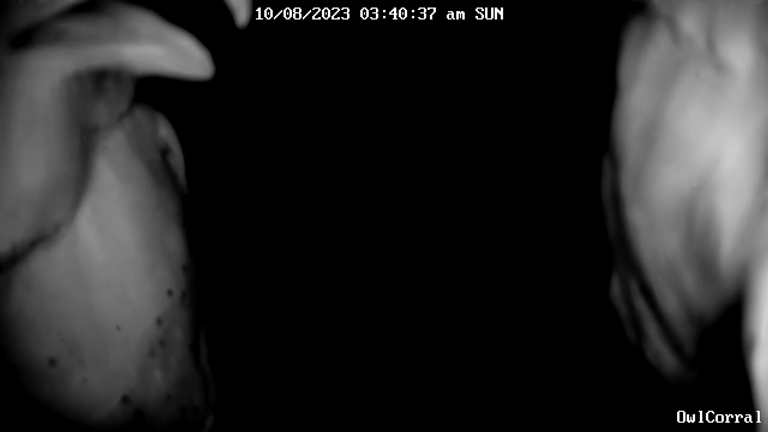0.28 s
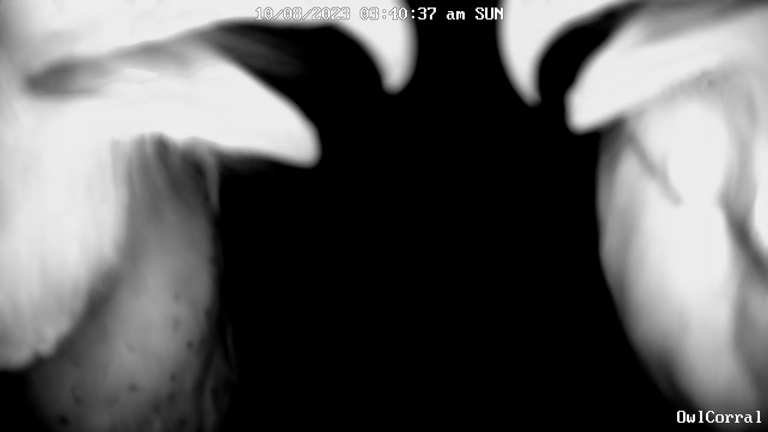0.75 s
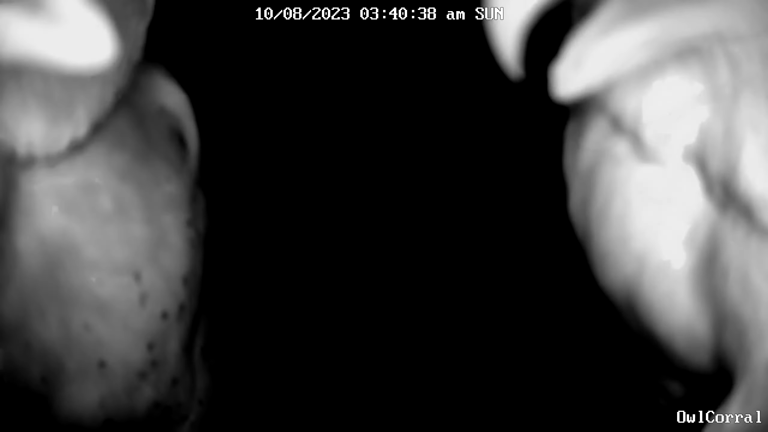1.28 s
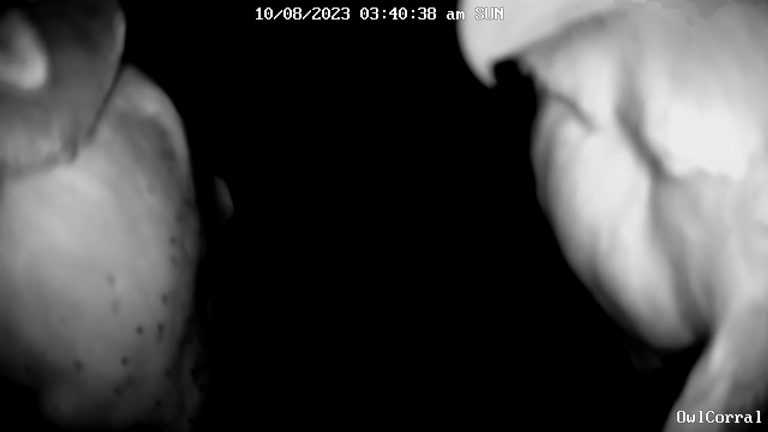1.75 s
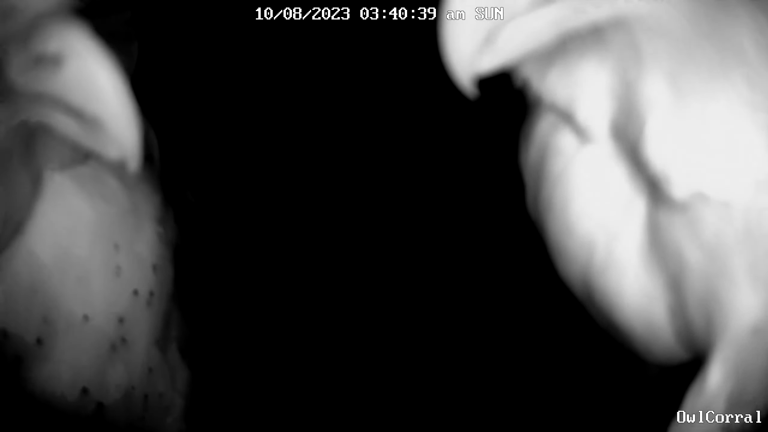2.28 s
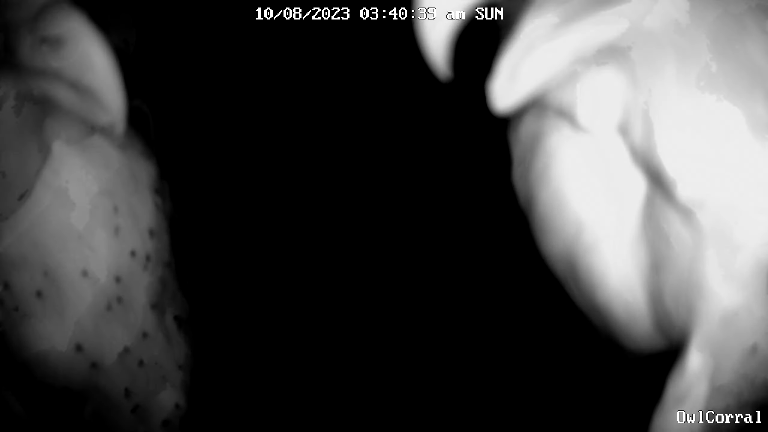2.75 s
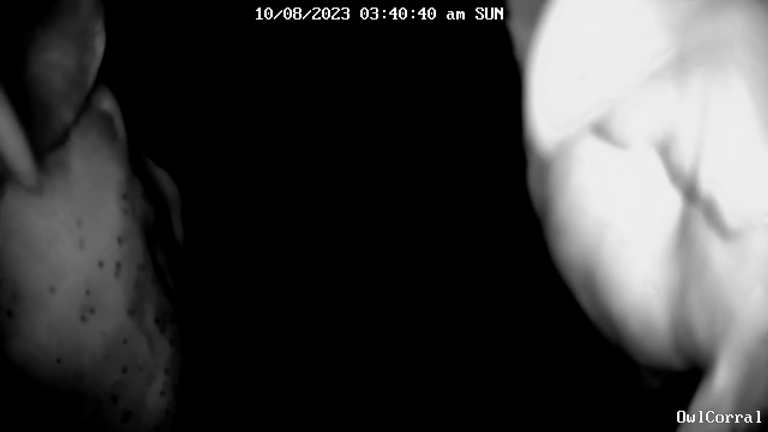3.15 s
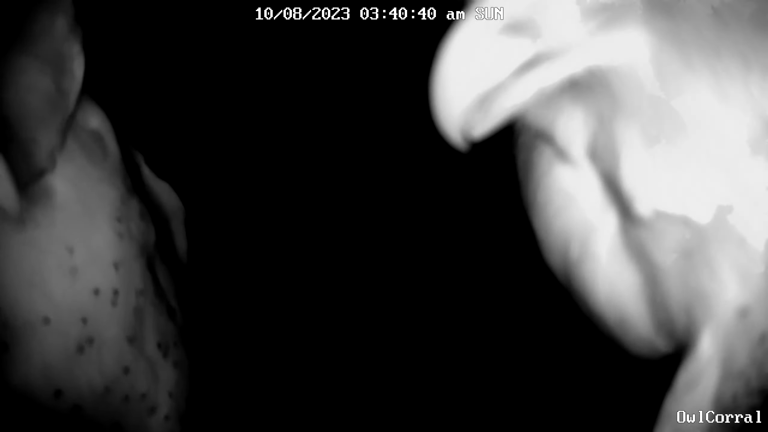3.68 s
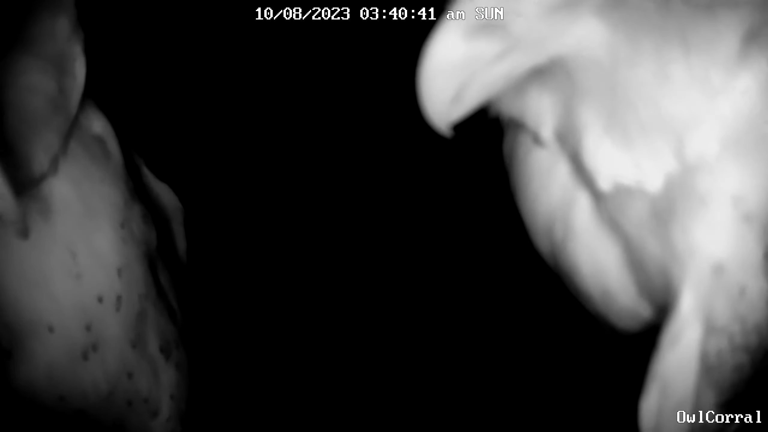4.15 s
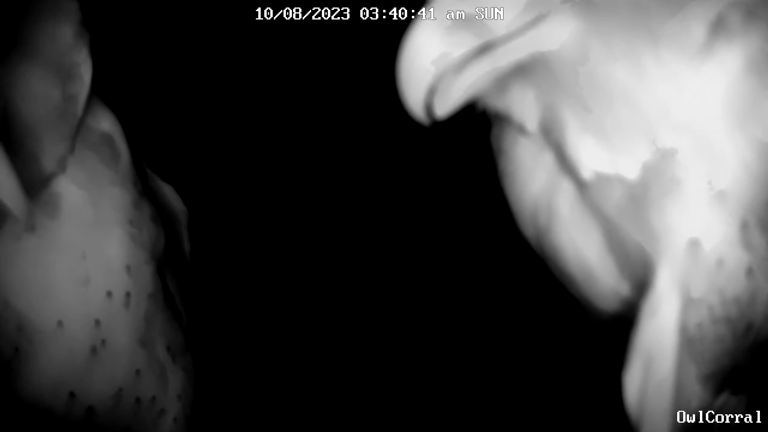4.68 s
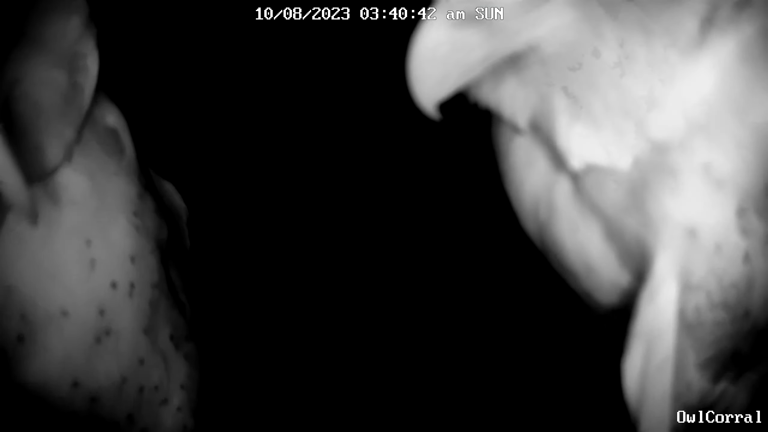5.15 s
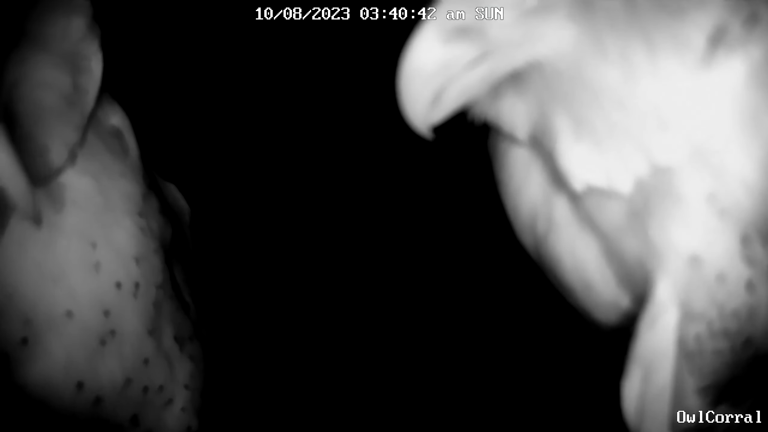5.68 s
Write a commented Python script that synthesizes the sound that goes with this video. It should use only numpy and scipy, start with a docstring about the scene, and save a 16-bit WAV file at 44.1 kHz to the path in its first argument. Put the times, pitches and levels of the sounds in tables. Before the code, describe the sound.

Inside a small wooden nest box, two owls nibble right beside a microphone. Sharp beak clicks, tiny squeaks and wet smacks come quickly over feather scrapes, soft thuds and low rumble. Three hard knocks strike the housing around two seconds, its mount humming low. Then the birds settle, leaving sparse, softer, squeakier beak closings and faint feather brushes over low background noise.

```python
"""Two owls nibble in a wooden nest box: their beaks part with wet smacks and close with squeaks and clicks.
Each squeak is a gliding tone, each smack a pulse rising in pitch, each click a damped ring with a noise crack.
Feathers scrape the housing of a small camera right beside them, as sparse damped grains and shaped noise.
The housing knocks and thuds in damped modes and low glides, rumbles as noise, and hums on its mount.
The box adds short noise tails; a steep low-pass dulls the contacts above about 5 kHz; low noise lies below."""
import sys
import numpy as np
from scipy import signal
from scipy.fft import rfft, irfft
from scipy.io import wavfile
from scipy.ndimage import uniform_filter1d

SR = 44100
rng = np.random.default_rng(int(sys.argv[2]) if len(sys.argv) > 2 else 0)


def master(y):
    """Save y as 16-bit WAV."""
    cut = np.clip(np.atleast_2d(y).T, -1, 1)
    pcm = np.round(cut * 32767)  # scale
    wavfile.write(sys.argv[1], SR, pcm.astype(np.int16))


N = 261513
TIME = np.arange(N) / SR

# Spectral weighting of the background: (frequency [Hz], relative level [dB])
FLOOR_SPECTRUM = [(15, 4), (45, -0.5), (75, 3.5), (100, -0.5), (122, 7.5), (180, -16), (300, -12.5),
                  (600, -23.5), (950, -19), (1700, -29), (4000, -30.5), (7400, -35), (9000, -49),
                  (16000, -52)]
# Spectral weighting of the bright hiss: (frequency [Hz], relative level [dB])
HISS_SPECTRUM = [(500, -7), (1000, -18.5), (1650, 0.5), (2600, -10), (3800, -6), (5500, -2), (7000, -1),
                 (8200, -12.5), (9400, -48.5)]
# Bursts of bright hiss: (start [s], length [s], starting level [dB], fall over the length [dB])
HISS_BURSTS = [(0.53, 0.085, -33, 29), (0.599, .15, -72, -1), (1.3045, .006, -24, 10),
               (1.306, 0.14, -39, 6.5), (1.748, 0.13, -43, 27), (1.794, 0.0051, -29.5, 6.5),
               (2.181, .006, -43, 18), (3.855, 0.089, -44.5, 26), (4.044, 0.08, -55, 9.5)]
# Spectral weighting of brushed plumage: (frequency [Hz], relative level [dB])
PLUMAGE_SPECTRUM = [(450, -14), (850, 8.5), (5000, -4), (7500, 4.5), (9000, -25)]
# Faint feather brushes: (start [s], length [s], rms level at the top of the swell [dB], pitch [Hz], Q [1])
BRUSHES = [(3.178, 0.24, -65, 1674, 0.59), (3.419, 0.19, -68.5, 1052, 1.2), (4.461, 0.048, -61, 831, 5),
           (5.169, 0.29, -68, 1000, 1.4), (5.605, 0.044, -61, 900, 3.4)]
# Pushes that set the mount swinging: (start [s], length [s], rms hum level at the top of the push [dB])
PUSHES = [(.95, 0.23, -30.5), (1.623, 0.2, -21), (1.804, .21, -23.5)]
# Spectral weighting of the housing's rumble: (frequency [Hz], relative level [dB])
RUMBLE_SPECTRUM = [(20, -4), (45, -6.5), (80, -6), (125, 2), (200, -12.5), (310, -8.5), (500, -18.5),
                   (900, -39)]
# Weight shifting against the housing: (time [s], rumble level before a common trim [dB])
WEIGHT_SHIFTS = [(0, -36.5), (.12, -41.5), (.2, -39), (.56, -34), (.64, -57), (.73, -43), (.92, -52.5),
                 (1.02, -33), (1.16, -54.5), (1.24, -42.5), (1.59, -52.5), (1.68, -40.5), (1.85, -32),
                 (2.05, -59), (2.9, -83.5)]
# Spectral weighting of scraped feathers: (frequency [Hz], relative level [dB])
SCRAPE_SPECTRUM = [(300, -13), (620, -9.5), (900, 5.5), (1200, 0.5), (1450, -7.5), (2400, -6.5), (3100, -9),
                   (4100, -11), (4450, 2.5), (4900, -8)]
# Rustle under the strokes, dying away as the birds settle: (time [s], level before a common trim [dB])
RUSTLE = [(0, -59.5), (.5, -62), (.64, -69), (1.1, -63.5), (1.18, -73), (1.26, -68), (1.85, -58.5),
          (2.05, -73.5), (2.4, -73), (2.9, -86.5)]
# Feather strokes along the housing: (start [s], length [s], top level before a common trim [dB])
STROKES = [(0, 0.1, -56.5), (.118, 0.092, -42.5), (.305, 0.059, -46.5), (.36, 0.061, -47.5),
           (.425, 0.18, -51), (.77, 0.055, -53.5), (.862, 0.052, -49.5), (1.08, 0.043, -45),
           (1.225, 0.043, -46), (1.44, 0.075, -55.5), (1.51, 0.065, -53), (1.625, 0.095, -47),
           (1.73, 0.075, -53), (1.895, 0.039, -52.5), (1.99, 0.039, -54.5), (2.12, 0.11, -52.5)]
# Soft thuds of a body on the housing: (start [s], length [s], starting pitch [Hz], peak level [dB])
THUDS = [(0.034, 0.024, 100, -27), (0.239, 0.047, 112, -21), (0.534, 0.052, 158.3, -18),
         (0.967, 0.051, 141.8, -14), (1.217, 0.029, 133.7, -31)]
# Hard knocks on the housing: (time [s], level [dB])
KNOCKS = [(1.6255, -12), (1.7965, -15.5), (2.1265, -16.5)]
# Modes of the housing: (mean frequency [Hz], level relative to the knock [dB], decay by 60 dB [s])
HOUSING_MODES = [(89, -17.5, 0.36), (163.65, -13, 0.24), (232.7, -12.5, 0.087), (271.4, 2.5, 0.11),
                 (302.1, -7.5, .05), (390, -15.5, 0.079), (715, -15.5, 0.033), (1135, -2.5, 0.033),
                 (1482, -10, 0.03), (1756, -20, 0.0041)]
# Spectral weighting of the box's reflections: (frequency [Hz], relative level [dB])
BOX_SPECTRUM = [(200, -8), (700, -1), (1400, -10.5), (2300, -7), (3500, -12.5), (4600, 1), (8000, 2.5)]
# Clicks, some alone, some together with a squeak or knock: (time [s], level [dB], pitch [Hz])
CLICKS = [(.045, -24, 880), (0.057, -18.5, 972), (.185, -22.5, 2240), (0.307, -35, 1200), (0.39, -28, 970),
          (0.458, -16.5, 3570), (0.506, -32, 2800), (0.7131, -17.5, 750), (.970, -33, 3470),
          (1.069, -34.5, 2800), (1.6237, -3, 4287), (1.677, -9.5, 2180), (1.7947, -9.5, 4530),
          (1.994, -13, 2000), (2.125, -3.5, 4197), (2.2007, -25, 1793), (2.6094, -15, 2500),
          (3.549, -44.5, 1800), (3.824, -29, 883), (3.857, -22.5, 1450), (4.156, -13.5, 2390),
          (4.48, -49, 1293), (4.871, -27.5, 1990), (5.61, -48, 1200)]
# Wet smacks as a beak opens: (start [s], starting pitch [Hz], level of the fundamental [dB])
SMACKS = [(1.217, 790, -18.5), (1.436, 790, -18), (1.6515, 840, -13.5), (1.897, 824, -19.5),
          (2.181, 1039, -20.5), (2.395, 764.5, -23), (2.587, 812, -23.5), (4.032, 718, -38.5),
          (4.8445, 819, -28)]
# Beak closings, a slide ending in a snap: (snap time [s], slide length [s], start pitch [Hz],
# end pitch [Hz], snap level [dB], slide level relative to the snap [dB], rasp or dryness [0-1])
CLOSINGS = [ (.149, 0.0063, 4596, 3900, -28, -3.5, 0.92), (0.463, 0.0076, 4230, 4450, -16, -8.5, 0.16),
            (.528, 0.0043, 3310, 4300, -14.5, -10, 0.77), (0.535, 0.0042, 4555, 4700, -3.5, -8.5, 0.01),
            (0.742, 0.006, 4220, 2300, -31.5, -4, 0.24), (.801, .008, 3700, 2010, -20, -18, 0.1),
            (.8665, 0.0065, 3600, 3060, -17, -21, 0.24), (1.0337, .0045, 4070, 2510, -17.5, -7, 0.02),
            (1.0953, 0.0026, 3433, 3950, -9, -14, 0.08), (1.247, 0.0057, 3500, 3000, -7, -8, 0),
            (1.306, 0.0018, 3610, 4000, -7, -10, 0.24), (1.411, 0.0065, 4830, 3700, -22.5, -7.5, 0.28),
            (1.422, 0.0076, 3650, 3000, -27.5, -6.5, .15), (1.466, .008, 3700, 2900, -13, -14, 0.01),
            (1.5232, .003, 3370, 3874, -4.5, -12, 0.4), (1.7402, 0.0027, 3400, 3860, -1.5, -10, 0.15),
            (1.921, 0.017, 3140, 2750, -15, -6, 0.26), (1.995, 0.0015, 3056, 3100, -19.5, -10, 0),
            (2.424, 0.012, 2542, 1300, -16, -6, 0.96), (2.618, .018, 2634, 1526, -15, -11.5, 0.49),
            (3.795, 0.014, 2623, 2380, -23, -7.5, 0.15), (3.857, .022, 4210, 2600, -17, -12.5, 0.34),
            (4.065, 0.024, 3206, 2650, -26.5, -11.5, 0.58), (4.156, 0.02, 3600, 2600, -25.5, -13.5, 0.94),
            (4.675, .019, 2773, 2650, -25, -11, 0.17), (4.87, 0.016, 2834, 2860, -29, -6, 0.41),
            (4.88, 0.0078, 2586, 1930, -31, -2.5, 0.25)]
# Resonances of the open beak: (frequency [Hz], Q [1], level relative to the source [dB])
BEAK_MODES = [(1440, 17, -6.5), (3078.6, 66, -12)]

FLOOR_DB = -64.5  # before the heave
MOUNT_HZ = 74.2  # mean pitch of the hum
PUSH_PEAK, STROKE_PEAK = 0.29, 0.67  # share of the length at which each is strongest
RING_ON_DB, RING_ON_FADE_S = -17, 0.14  # the mount rings on after a push
SHAKE_DB, SHAKE_FADE_S = -18.5, 0.024  # knocks and thuds leave the housing rumbling
JOLT_DB, JOLT_FADE_S = -18, 0.028  # each beak contact jolts the body
JOLT_LIMIT, JOLT_TOP_HZ = 0.15, 140  # amplitude at which a jolt saturates; low-pass of its rumble
TRAIL_DB, TRAIL_FADE_S = -28, 0.0031  # a short grainy noise tail follows each beak contact
THUD_SAG = 0.72  # end pitch over start pitch
CRACK_TOP = 2.6  # cutoff of a crack over its pitch
TIP_DB, TIP_HZ, TIP_LEAD_S = -0.5, 1760, 0.0014  # tip click of a fully dry closing; lead before its snap
SMACK_S, SMACK_RISE = 0.0064, 1.724  # length; end pitch over start pitch
SNAP_S, SLIDE_ATTACK_S = 0.0031, 0.0046  # half the length of a snap; rise of a slide
GLIDE_BEND = 1.8  # over 1: the pitch moves faster and faster as the beak shuts
DULL_HZ, TOP_HZ = 4536, 16400  # low-pass of the contacts; top of the recorder
CEILING = 0.82  # amplitude that rounded peaks approach


def undb(db):
    """Level to amplitude: 20 dB is a factor of ten."""
    return 10 ** (np.asarray(db) / 20)


def unit(x):
    """Normalisation: divide by the root mean square."""
    return x / np.sqrt(np.mean(x ** 2) + 1e-18)


def curve(rows):
    """Envelope: gain interpolated in decibels from (time [s], level [dB])."""
    return undb(np.interp(TIME, *np.transpose(rows), right=-120))


def add(track, s, sound):
    """Superposition: sum a sound into the track at a time in seconds."""
    start = int(s * SR)
    track[start:start + len(sound)] += sound[:N - start]


def colour(x, points):
    """Spectral weighting: scale each frequency by a smooth curve, then normalise to rms 1."""
    hz, db = np.transpose(points)
    f = np.arange(len(x) // 2 + 1) * SR / len(x)
    gain = undb(np.interp(np.log(f + 1), np.log(hz), db, right=-120))
    return unit(irfft(rfft(x) * gain, len(x)))


def lowpass(x, hz, order):
    """Low-pass filtering: a causal Butterworth attenuates above its cutoff."""
    return signal.sosfilt(signal.butter(order, min(hz, SR / 2 - 1), fs=SR, output="sos"), x)


def highpass(x, hz, order):
    """High-pass filtering: a causal Butterworth attenuates below its cutoff."""
    return signal.sosfilt(signal.butter(order, hz, "high", fs=SR, output="sos"), x)


def band(x, hz, q):
    """Resonance: one peak whose Q sets its width."""
    return signal.lfilter(*signal.iirpeak(hz, max(q, hz / 10000), fs=SR), x)


def wander(size, rate):
    """Random modulation: normal values, rate a second, joined by straight lines."""
    place = np.arange(size) / SR * rate
    knots = rng.standard_normal(size + 1)
    return np.interp(place, np.arange(size + 1), knots)


def swell(length, peak):
    """Envelope: a rounded rise and fall, its top at the given share of the length."""
    u = np.linspace(0, 1, max(int(length * SR), 2))
    ramp = np.interp(u, [0, np.clip(peak, 0.05, 0.95), 1], [0, 1, 0])
    return np.sin(np.pi / 2 * ramp) ** 0.92


def strokes(rows, peak):
    """Envelope: summed swells from (start [s], length [s], level [dB])."""
    out = np.zeros(N)
    for s, length, db in rows:
        add(out, s, undb(db) * swell(length, peak))
    return out


def lingering(x, fade_s):
    """Energy integration: the square root of exponentially averaged power lets go slowly."""
    keep = np.exp(-1 / (fade_s * SR))
    return np.sqrt(signal.lfilter([1 - keep], [1, -keep], x ** 2) + 1e-18)


def glide(size, start_hz, end_hz, jitter, rate, bend=1):
    """Frequency modulation: phase is the running sum of an unsteady, gliding frequency."""
    hz = start_hz + (end_hz - start_hz) * np.linspace(0, 1, size) ** bend
    return 2 * np.pi * np.cumsum(hz * (1 + jitter * wander(size, rate))) / SR


def still_air():
    """Broadband background: mostly low noise whose level heaves gently at random."""
    heave_db = wander(N, rate=12)
    return colour(rng.standard_normal(N), FLOOR_SPECTRUM) * undb(FLOOR_DB + heave_db)


def hiss_and_brushes():
    """Shaped noise: bursts of bright hiss, mostly falling in level, and soft resonant brushes of plumage."""
    level = np.zeros(N)
    for s, length, db, fall_db in HISS_BURSTS:
        progress = np.linspace(0, 1, int(length * SR))
        release = np.minimum(5 * (1 - progress), 1)  # fades over the last fifth
        add(level, s, undb(db - fall_db * np.sqrt(progress)) * release)
    hiss = colour(rng.standard_normal(N), HISS_SPECTRUM) * undb(1.5 * wander(N, rate=200))
    out = uniform_filter1d(level, size=64) * hiss
    for s, length, db, hz, q in BRUSHES:
        env = swell(length, peak=0.83)
        air = colour(band(rng.standard_normal(len(env)), hz, q), PLUMAGE_SPECTRUM)
        add(out, s, undb(db) * env * air)
    return out


def swinging():
    """Driven oscillation: the mount hums near its resonance while pushed, then rings on faintly."""
    push = strokes(PUSHES, PUSH_PEAK)
    size = np.maximum(push, undb(RING_ON_DB) * lingering(push, RING_ON_FADE_S))
    hum = np.sqrt(2) * np.sin(glide(N, MOUNT_HZ, MOUNT_HZ, jitter=0.03, rate=15))
    return hum * size


def leaning(blows, rumble_db=-1, flutter_db=3):
    """Sliding friction: a body rubs unevenly along the housing, which rumbles more after each blow."""
    shake = undb(SHAKE_DB) * lingering(blows, SHAKE_FADE_S)
    weight = np.hypot(undb(rumble_db) * curve(WEIGHT_SHIFTS), shake)
    rumble = colour(rng.standard_normal(N), RUMBLE_SPECTRUM)
    return rumble * weight * undb(flutter_db * wander(N, rate=43))


def jolting(beak):
    """Structure-borne sound: nibbles pass through the body into the housing as a short deep rumble."""
    push = lingering(JOLT_LIMIT * np.tanh(beak / JOLT_LIMIT), JOLT_FADE_S)
    rumble = colour(rng.standard_normal(N), RUMBLE_SPECTRUM)
    return lowpass(undb(JOLT_DB) * push * rumble, JOLT_TOP_HZ, order=4)


def scraping(beak, rate=1100, spread_db=6.0, cycles=6.1, smooth=0.35, patchy_db=3, scrape_db=-1):
    """Stick-slip: feather barbs catch and slip in uneven patches, each with its own brief pitch."""
    rustle_s = RUSTLE[-1][0]
    barbs, t = np.zeros(N), TIME[:400]
    for when, pitch, size in rng.random((int(rustle_s * rate), 3)):
        hz = 600 + 4000 * pitch
        grain = np.sin(2 * np.pi * hz * t) * np.exp(-t * hz / cycles)
        strength = undb(-spread_db * np.log(size + 0.02)) * np.sqrt(hz)  # few strong, many weak
        add(barbs, when * rustle_s, strength * grain)
    scrape = colour(unit(barbs) + smooth * rng.standard_normal(N), SCRAPE_SPECTRUM)
    rub = undb(scrape_db) * (curve(RUSTLE) + strokes(STROKES, STROKE_PEAK))
    trail = undb(TRAIL_DB) * lingering(beak, TRAIL_FADE_S)
    return scrape * np.hypot(rub, trail) * undb(patchy_db * wander(N, rate=160))


def thuds():
    """Soft impact: a low tone sags in pitch while a little filtered noise scuffs."""
    out = np.zeros(N)
    for s, length, start_hz, db in THUDS:
        env = swell(length, peak=0.42)
        phase = glide(len(env), start_hz, start_hz * THUD_SAG, jitter=0.15, rate=73)
        noise = band(rng.standard_normal(len(env)), hz=2 * start_hz, q=0.72)
        scuff = unit(lowpass(noise, hz=3 * start_hz, order=6))
        add(out, s, undb(db) * env * (np.sin(phase) + 0.14 * scuff))
    return out


def knocks(rise_s=0.00017, body_db=-17, body_s=0.04):
    """Modal excitation: a blow rings damped modes, the low ones building up later, over a dull thump."""
    out, t = np.zeros(N), TIME[:SR // 2]
    for s, db in KNOCKS:
        for hz, mode_db, t60 in HOUSING_MODES:
            rise = 1 - np.exp(-t / rise_s * hz / 300)  # rise_s holds at 300 Hz
            detune = 1 + 0.025 * rng.standard_normal()
            decay = np.exp(-np.log(1000) * t / t60)
            ring = np.sin(2 * np.pi * hz * detune * t) * decay
            add(out, s, undb(db + mode_db) * rise * ring)
        noise = band(rng.standard_normal(len(t)), hz=221, q=0.88)
        thump = unit(lowpass(noise, hz=440, order=4))
        add(out, s, undb(db + body_db) * thump * np.exp(-t / body_s))
    return out


def box(x):
    """Reverberation: close wooden walls add two dense noise tails, both set in about 1 ms after the sound."""
    t = TIME[:SR // 3]
    arrive = np.clip(t / 0.00053 - 1, 0, 1)
    response = 0
    for t60_s, db in ((0.048, -14), (0.021, -26)):
        decay = np.exp(-np.log(1000) * t / t60_s)
        echoes = colour(rng.standard_normal(len(t)), BOX_SPECTRUM) * arrive * decay
        response = response + undb(db) * unit(echoes) / np.sqrt(len(t))  # energy set by the level
    return x + signal.fftconvolve(x, response)[:N]


def clicks(ring_s=0.0006, crack_s=0.0017, crack_db=-10):
    """Impulsive contact: each click, listed or at a closing, is a damped ring and a short noise crack."""
    out, t = np.zeros(N), TIME[:1024]
    tips = []
    for s, *_, db, _, rasp in CLOSINGS:
        dryness_db = 10 * np.log10(abs(rasp) + 1e-9)
        tips.append((s - TIP_LEAD_S, db + TIP_DB + dryness_db, TIP_HZ))
    for s, db, hz in CLICKS + tips:
        ring = np.sin(2 * np.pi * hz * t) * np.exp(-t / ring_s)
        noise = band(rng.standard_normal(len(t)), hz, q=0.8)
        crack = unit(lowpass(noise, CRACK_TOP * hz, order=4)) * np.exp(-t / crack_s)
        add(out, s, undb(db) * (ring + undb(crack_db) * crack))
    return out


def smacks(slope_db=-8):
    """Film rupture: a wet film parts as the beak opens, a few quick harmonic pulses rising in pitch."""
    out = np.zeros(N)
    env = swell(SMACK_S, peak=0.4)
    for s, hz, db in SMACKS:
        phase = glide(len(env), hz, hz * SMACK_RISE, jitter=0.04, rate=490)
        pulses = sum(undb(slope_db * k) * np.cos((k + 1) * phase) for k in range(4))
        add(out, s, undb(db) * env * pulses)
    return out


def squeaks(overtone_db=-9, grit_db=-6, flutter=1.0):
    """Friction whistle: wet horn slides on horn and snaps shut, catching and crackling the drier it is."""
    out = np.zeros(N)
    for s, slide_s, start_hz, end_hz, db, slide_db, rasp in CLOSINGS:
        t = np.arange(-slide_s, SNAP_S, 1 / SR)  # zero at the snap
        size = len(t)
        half_width = np.where(t < 0, min(slide_s, SNAP_S), SNAP_S)
        snap = np.cos(np.pi / 2 * np.clip(t / half_width, -1, 1))
        slide = undb(slide_db) * np.minimum((t + slide_s) / SLIDE_ATTACK_S, 1) * (t < 0)
        env = np.maximum(snap, slide)
        phase = glide(size, start_hz, end_hz, jitter=0.06 * rasp, rate=900, bend=GLIDE_BEND)
        whistle = np.sin(phase) * (1 + flutter * rasp * wander(size, rate=640))
        overtone = rasp * undb(overtone_db) * np.sin(2 * phase)
        # cubed noise is spiky, so it crackles
        grit = unit(band(rng.standard_normal(size) ** 3, hz=2000, q=0.35))
        add(out, s - slide_s, undb(db) * env * (whistle + overtone + rasp * undb(grit_db) * grit))
    return out


def beak_sounds(thin_hz=380):
    """Radiation and resonance: a small beak radiates little bass, and its cavity rings after each contact."""
    source = highpass(squeaks() + clicks(), thin_hz, order=2) + smacks()
    return source + sum(undb(db) * band(source, hz, q) for hz, q, db in BEAK_MODES)


def scene(leak_db=-39):
    """Mixing: contacts ring in the box and pass a steep low-pass, beside hiss, rumble, hum and low noise."""
    beak, blows = beak_sounds(), knocks() + thuds()
    contact = box(beak + blows + scraping(beak))
    dull = signal.sosfiltfilt(signal.butter(20, DULL_HZ, fs=SR, output="sos"), contact)
    leak = undb(leak_db) * lowpass(beak, hz=7100, order=8)  # a faint brighter copy of the beak
    housing = leaning(blows) + jolting(beak) + swinging()
    return (still_air() + hiss_and_brushes() + housing + leak + dull)[None]


def record(dry):
    """Saturation and band limiting: the recorder rounds off the loudest peaks and cuts the top."""
    rounded = dry / (1 + (dry / CEILING) ** 8) ** (1 / 8)
    return signal.sosfilt(signal.ellip(8, 0.2, 70, TOP_HZ, fs=SR, output="sos"), rounded)


dry = scene()
out = record(dry)
master(out)
```